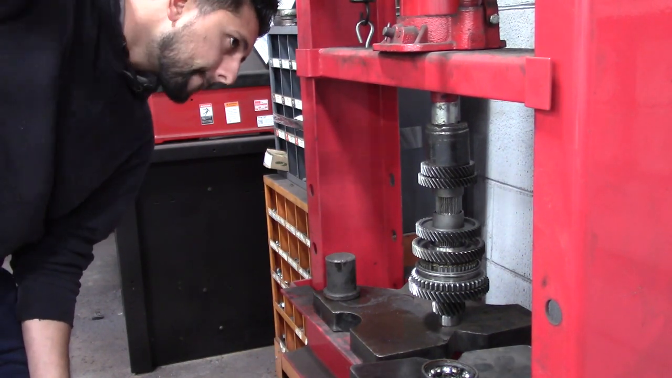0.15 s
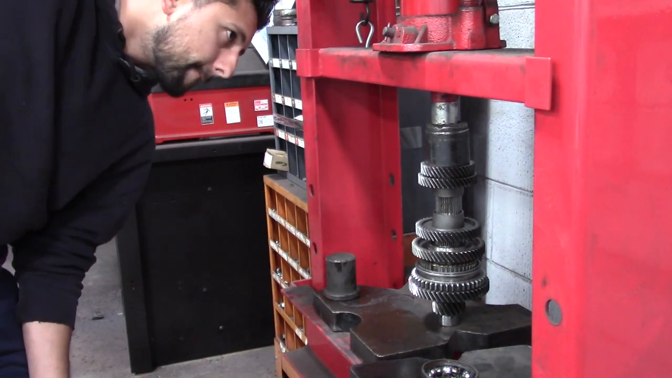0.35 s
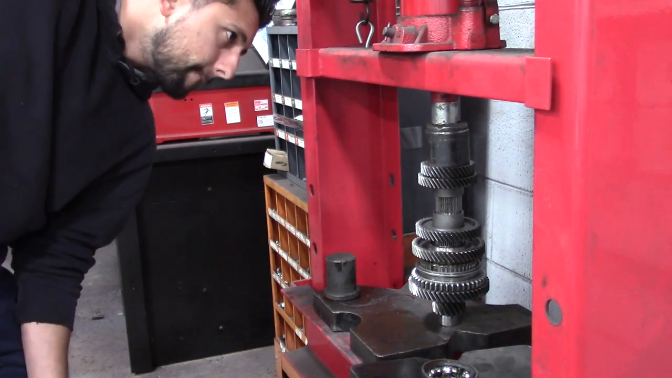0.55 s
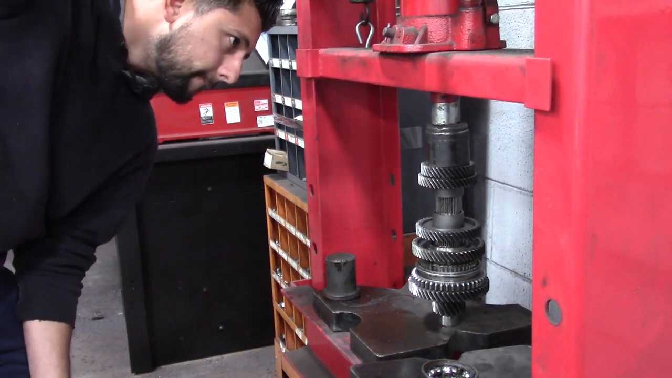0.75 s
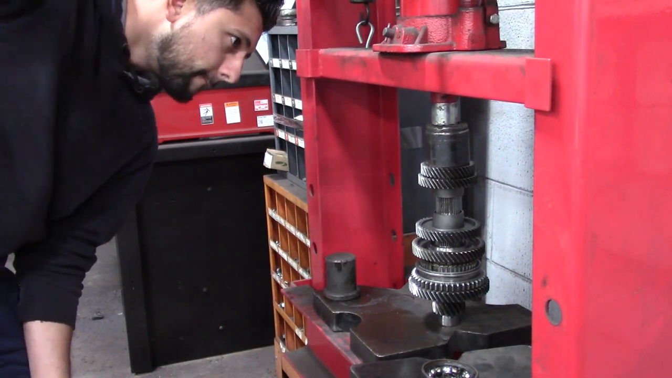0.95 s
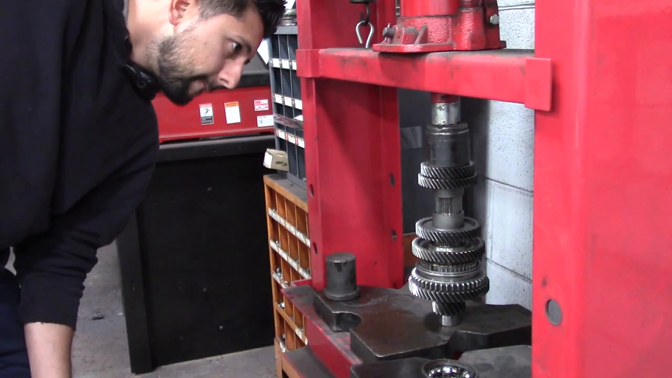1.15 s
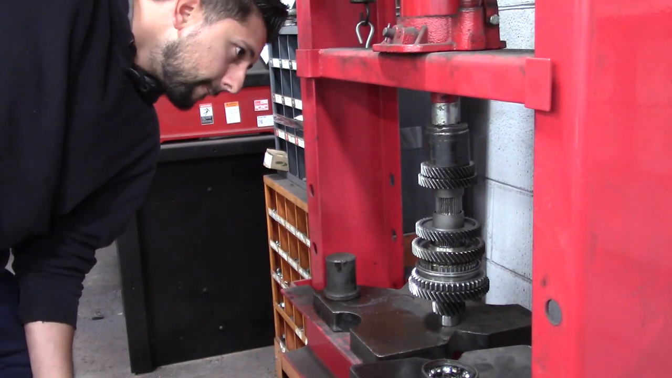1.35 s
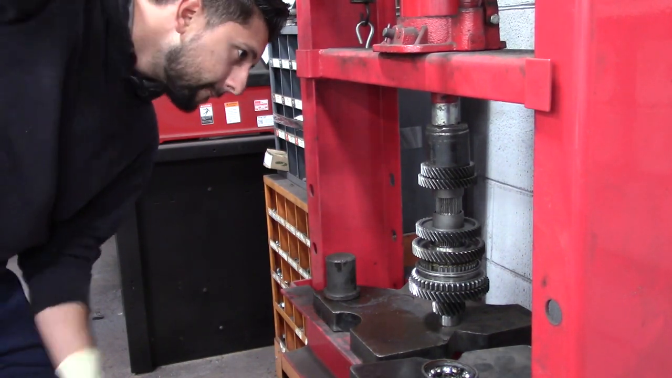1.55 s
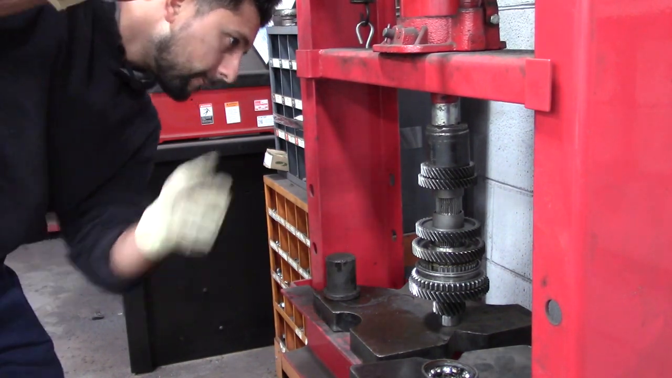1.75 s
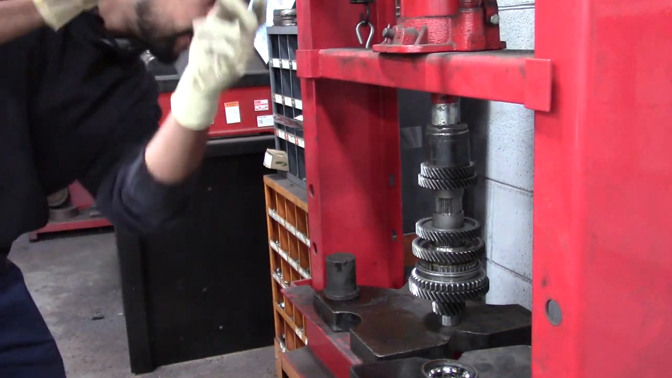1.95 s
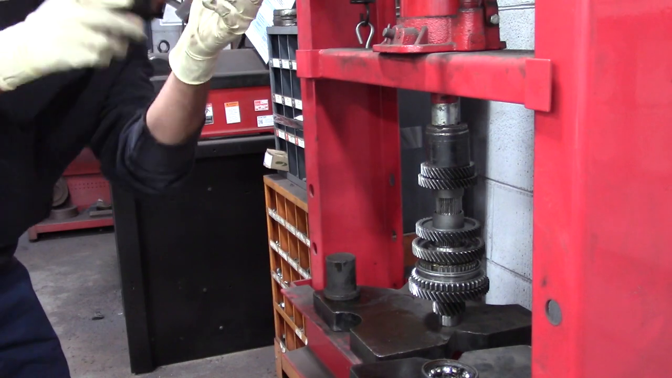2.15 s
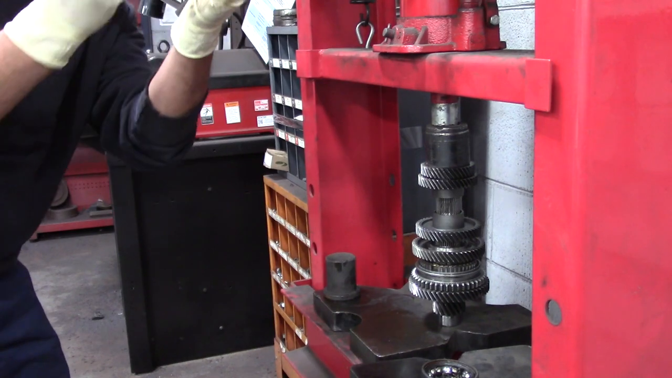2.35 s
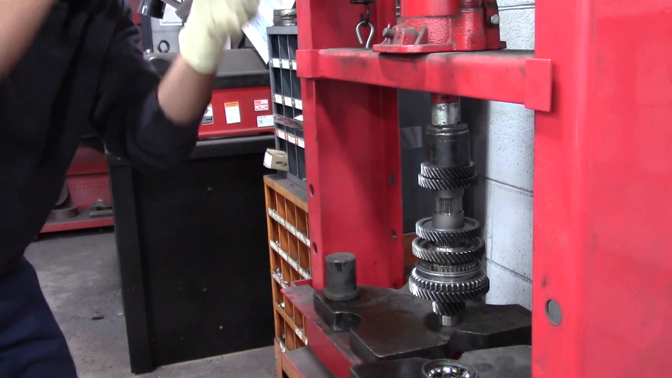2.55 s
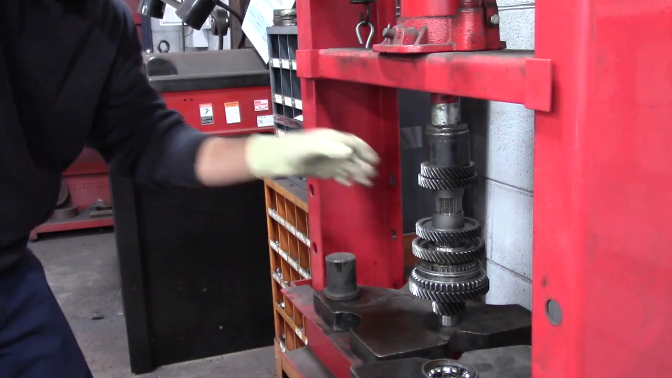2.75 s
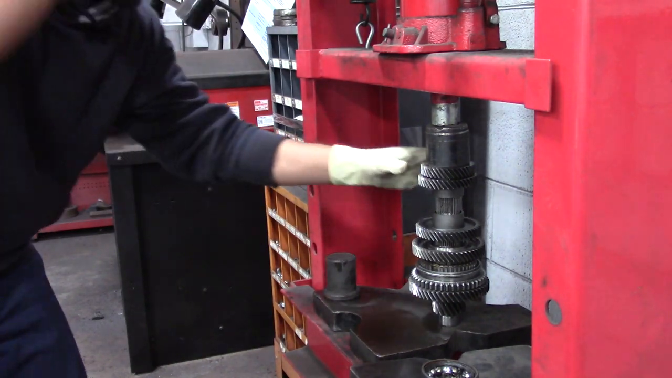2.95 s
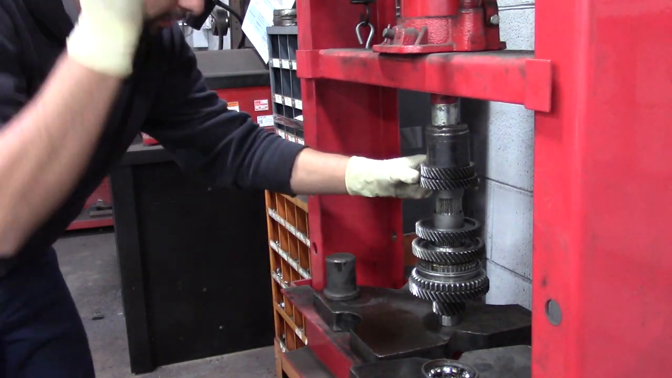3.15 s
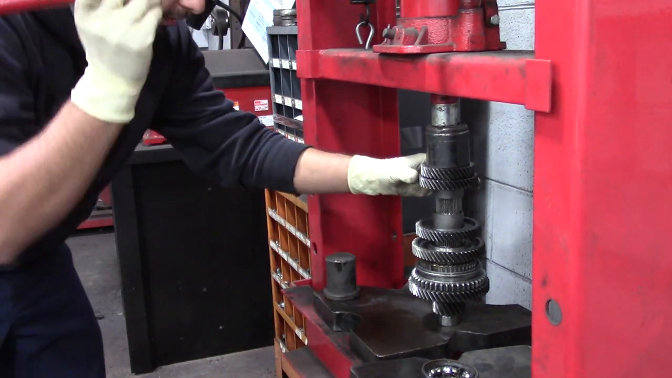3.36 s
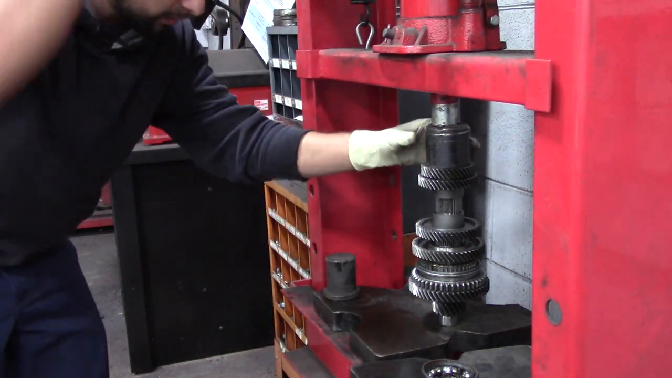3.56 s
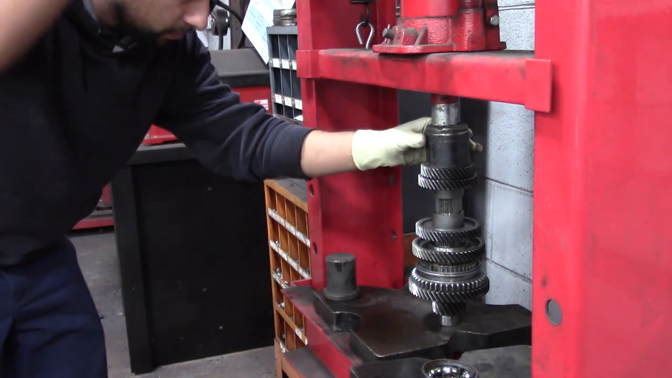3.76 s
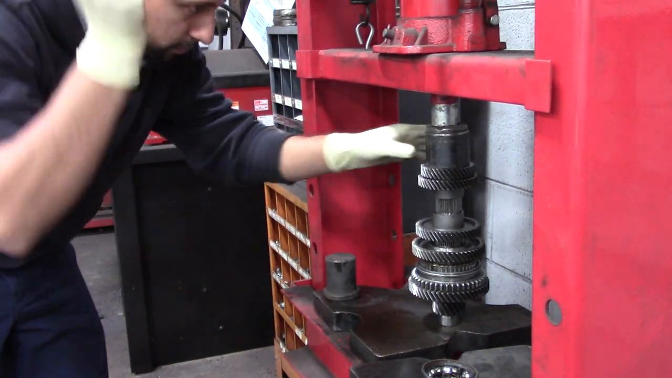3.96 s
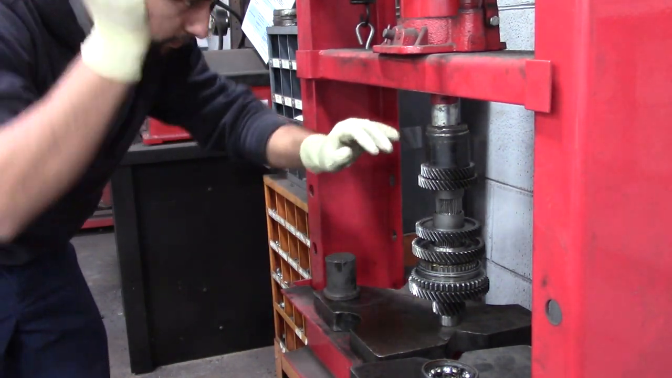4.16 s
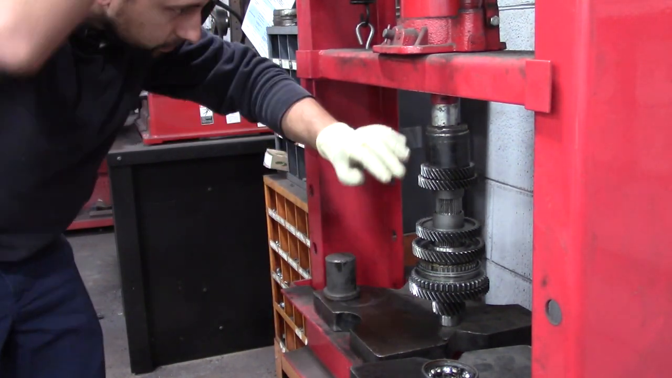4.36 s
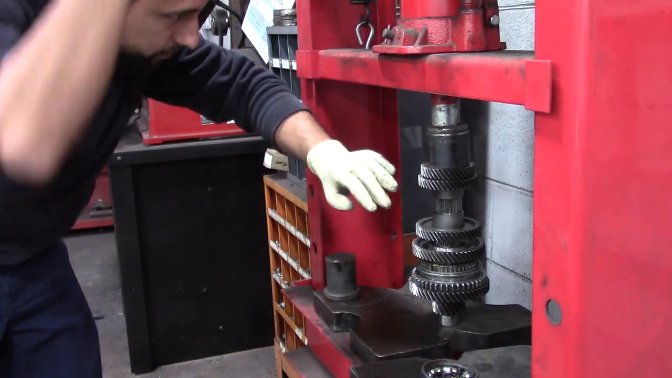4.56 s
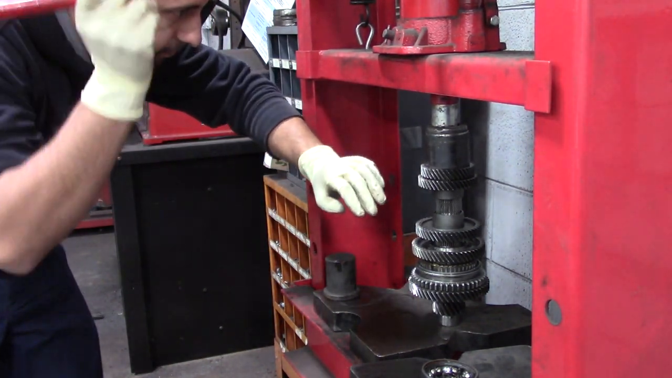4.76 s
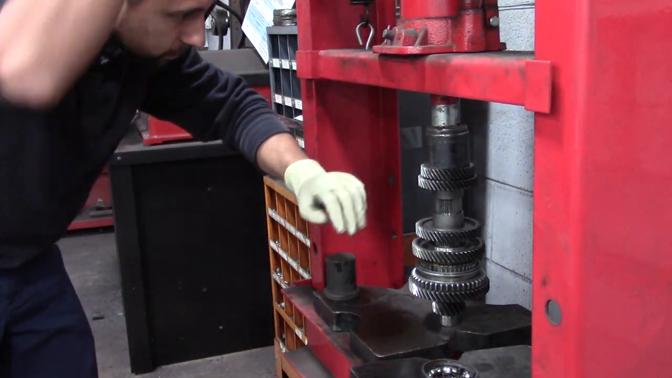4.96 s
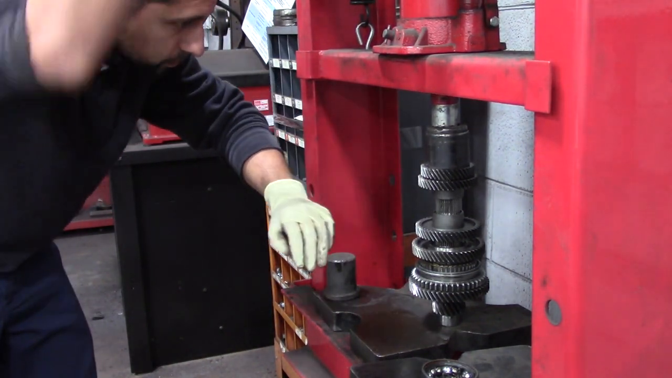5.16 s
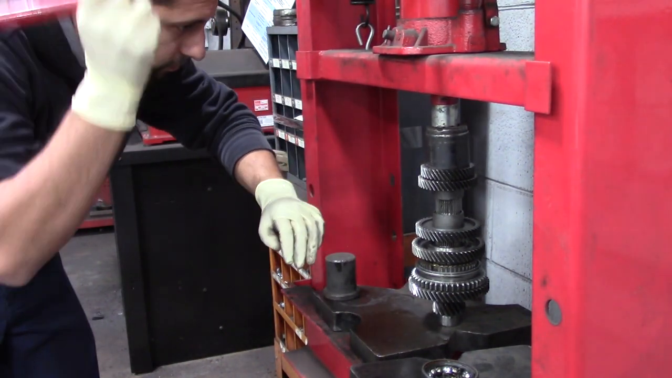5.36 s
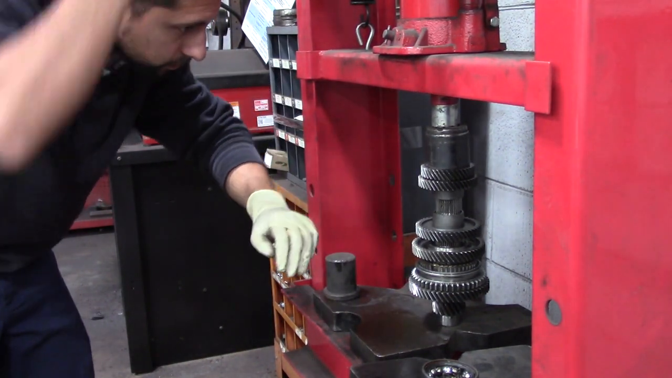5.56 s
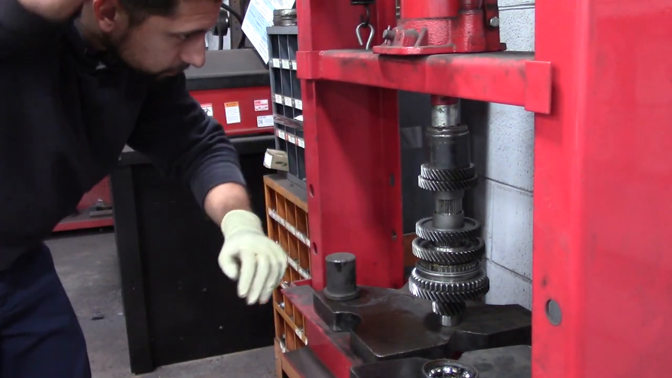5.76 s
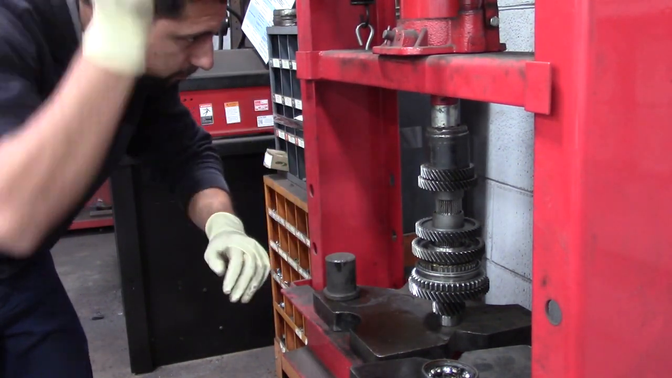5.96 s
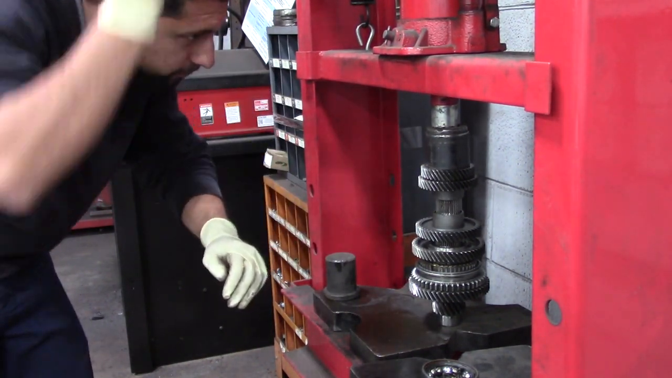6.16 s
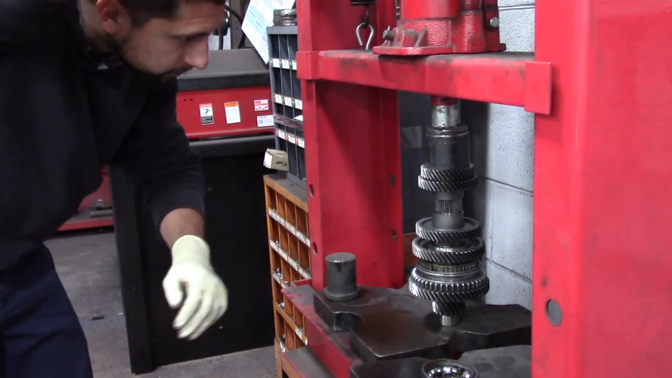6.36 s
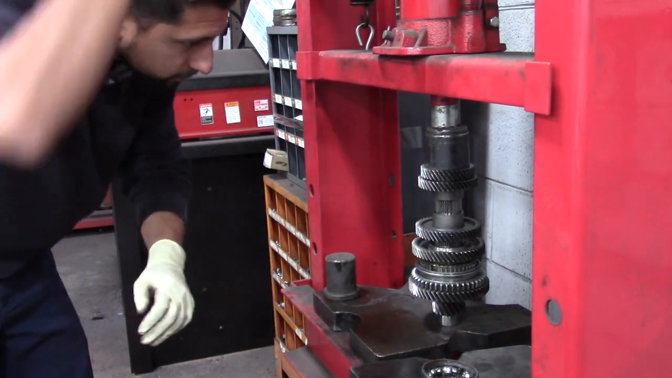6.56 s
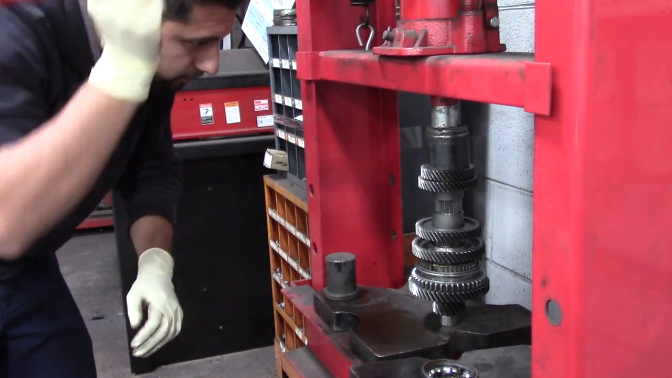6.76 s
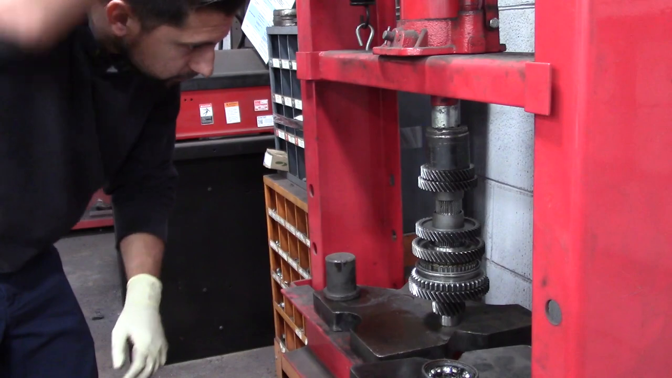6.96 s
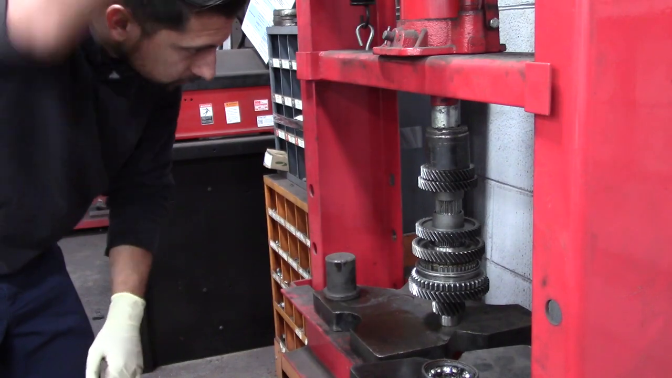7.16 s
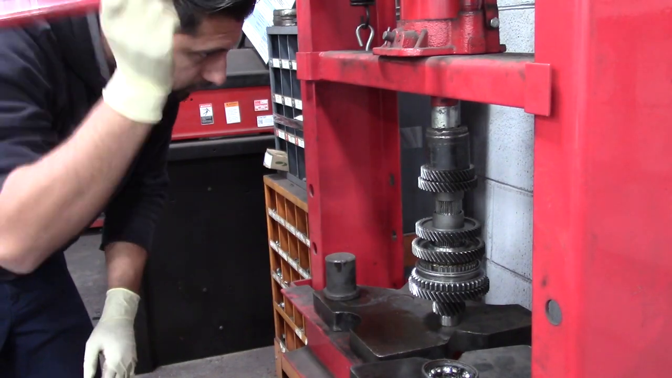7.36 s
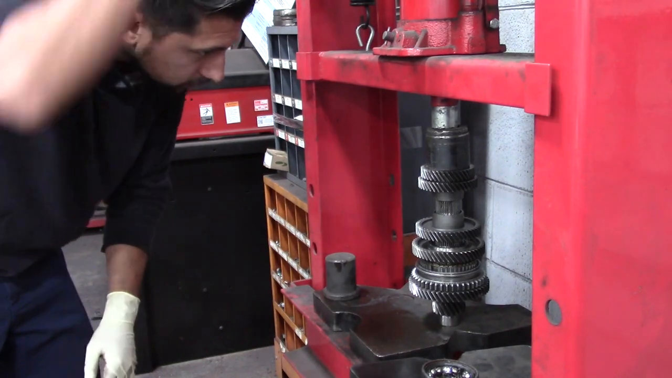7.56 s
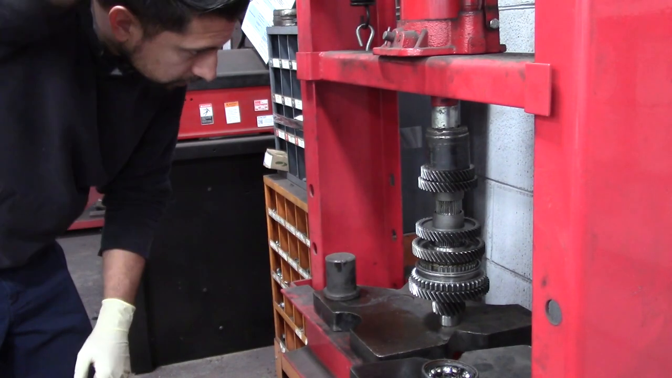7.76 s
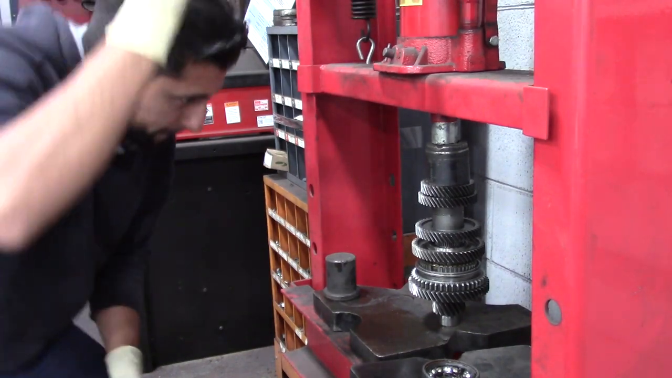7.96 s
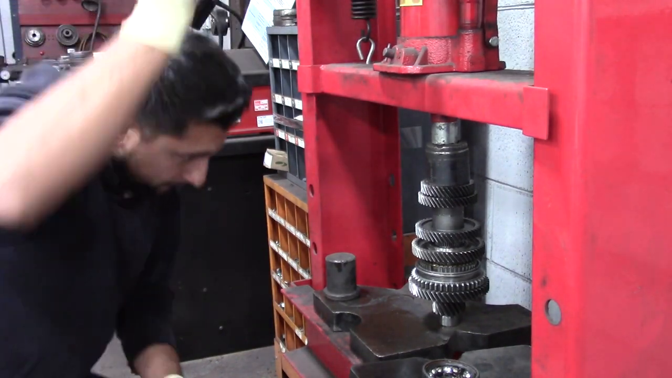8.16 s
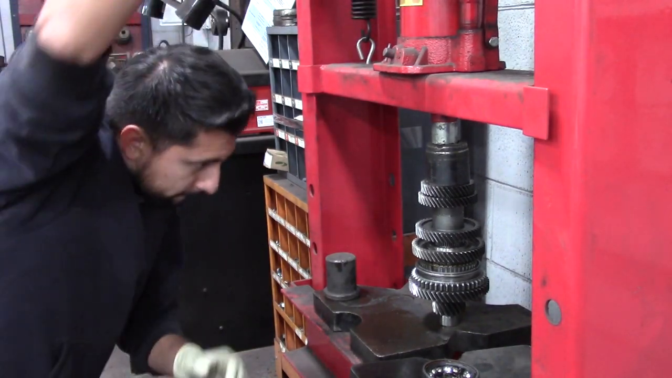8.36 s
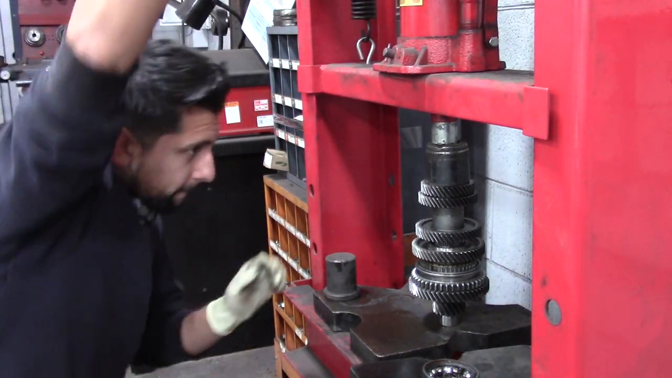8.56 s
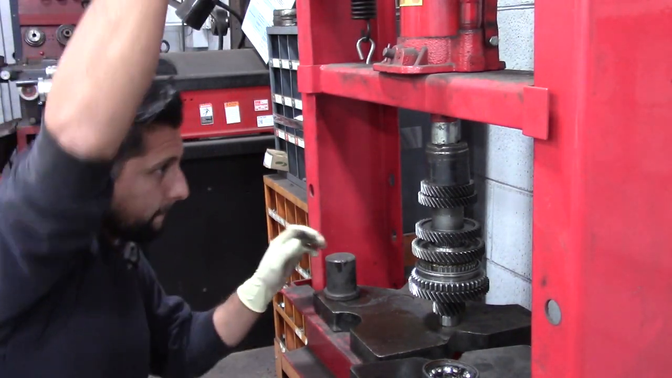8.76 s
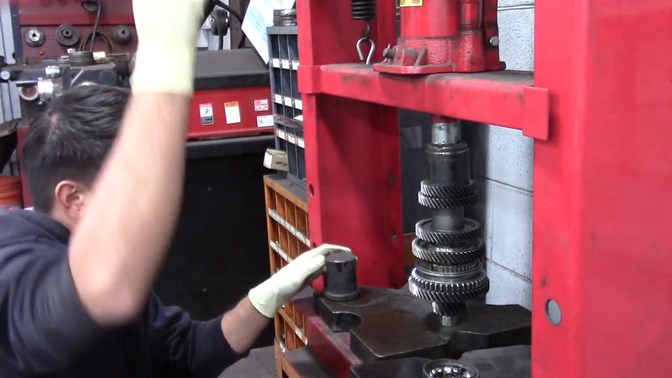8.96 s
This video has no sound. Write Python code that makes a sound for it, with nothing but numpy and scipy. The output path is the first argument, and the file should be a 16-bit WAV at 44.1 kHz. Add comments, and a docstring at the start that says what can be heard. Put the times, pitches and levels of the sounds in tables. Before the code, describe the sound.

Repeated metal clacks, short scrapes and ringing booms come from a hydraulic shop press being pumped by hand in a garage.

```python
"""A hydraulic shop press pumped by hand in a garage, heard from a close stereo microphone with a limiter.
The steel knocks, then the first push: the loose handle crosses its play (tick, clink, clack), the load
comes on and the whole frame booms. On the way back the pin scrapes and the handle rattles in its socket.
After a second push and a pause, the strokes settle to one about every two thirds of a second.
Two soft scuffs come around the last push, near 8.6 s. Workshop air and a faint hum lie under it all."""
import sys
import numpy as np
from scipy import signal
from scipy.fft import rfft, irfft
from scipy.io import wavfile
from scipy.ndimage import uniform_filter1d

SR = 44100
rng = np.random.default_rng(int(sys.argv[2]) if len(sys.argv) > 2 else 0)


def wrap_up_sound(samples):
    """Save the sound to the file named by the first command line argument, as 16-bit audio."""
    columns = np.atleast_2d(samples).T
    # keep every value between -1 and 1, then stretch to whole-number steps
    tamed = np.clip(columns, -1, 1)
    steps = np.round(tamed * 32767).astype(np.int16)
    wavfile.write(sys.argv[1], SR, steps)


N = 397782

JOLT_LAG_S, GEAR_LAG_S, JOLT_CUT_HZ = 0.006, 0.021, 394
# Down strokes: clack_s, play_s, swing_db, load_wait_s, boom_db, slip_s, bass_lift_db, gear_db
PUSH_STROKES = [(.592, 0.061, -9, 0.037, -9, 0.035, 1.5, -29),
                (1.393, 0.055, -8.5, .037, -8, 0.026, 0.5, -23),
                (2.969, 0.061, -14.5, 0.052, -6.5, 0.12, 3.5, -11),
                (3.833, 0.052, -8, 0.035, -6.5, 0.091, -1.5, -15.5),
                (4.547, 0.048, -7.5, 0.031, -7.5, 0.085, 0, -15.5),
                (5.200, 0.047, -7.5, 0.03, -7, 0.11, 0.5, -11),
                (5.850, 0.047, -7, 0.03, -7.5, 0.11, 0, -10), (6.518, 0.05, -6, .031, -9, 0.135, -3.5, -17),
                (7.184, 0.044, -6, 0.031, -9, 0.073, -3.5, -17.5),
                (7.842, 0.051, -6.5, 0.034, -7, 0.0093, -3.5, -41),
                (8.622, 0.067, -12.5, 0.165, -9.5, 0.076, 2, -24)]

def pushes():
    """Socket, pin and link meet in turn, then the load comes on. Gives linkage and frame sound apart."""
    linkage, booms, jolts = np.zeros((3, N))
    for clack_s, play_s, swing_db, wait_s, boom_db, slip_s, bass_db, gear_db in PUSH_STROKES:
        add(linkage, clack_s - play_s, bounced(tick, swing_db - 9.5))
        add(linkage, clack_s - 0.48 * play_s, clink(swing_db - 0.5))
        add(linkage, clack_s, clack(swing_db))
        add(jolts, clack_s + JOLT_LAG_S, jolt(swing_db - 9.5))
        load_s = clack_s + wait_s
        add(booms, load_s, stressed(boom(boom_db, slip_s), THUMP_HZ, boost_db=bass_db, octaves=0.79))
        add(linkage, load_s + GEAR_LAG_S, gear_ring(gear_db))
    return linkage, high_pass(booms, hz=119) + high_pass(jolts, hz=JOLT_CUT_HZ)

FRAME_T60_S, FRAME_MODES_DB = 0.94, 3
THUMP_HZ, THUMP_DB, THUMP_PEAK_S = 260, -8, 0.007
# Main modes of the press frame: pitch_hz, level_db
FRAME_MODES = [(153, -9.5), (218, 1.5), (236, 2.5), (281, -2), (441, 4), (458, 5), (504, 5), (520, 6),
               (581, 7), (601, 10), (631, 9), (654, 12.5), (678, 10), (711, 12), (838, 6), (868, 5),
               (955, 6.5), (1026, -3.5), (1078, 1.5), (1126, -3.5), (1238, 0.5), (1328, 0.5), (1403, -4),
               (1489, -21), (1522, -5.5), (1835, -6), (1915, -9)]
# One barely damped mode that sings on between strokes: pitch_hz, level_db, t60_s
FRAME_SINGING_MODE = [(755, 0, 3.1)]
# The frame's lesser modes: pitch_hz, density_db, t60_s
FRAME_LESSER = [(30, -75, 0.23), (85, -38, .5), (125, -8.5, 0.6), (335, 1, 0.86), (614, -2, 1),
                (950, -3.5, 1), (1410, -11, 0.59), (2190, -13.5, 0.54), (2540, -22.5, 0.71),
                (5030, -37.5, 0.78), (7000, -56, 0.19), (16000, -104, .15)]

def boom(db, slip_s):
    """The gear breaks loose with a low thump and feeds the frame for as long as it slips."""
    tilt = np.clip(-1.4 + 12.7 * slip_s, -1, 1.5)  # a longer slip is brighter
    modes = damped(FRAME_MODES, FRAME_T60_S) + FRAME_SINGING_MODE
    ring = strike(modes, FRAME_LESSER, modes_db=FRAME_MODES_DB, rise_s=0.0028, rasp_db=-0.5,
                  size=65536, tilt=tilt, centre_hz=660, slip_s=slip_s)
    t = np.arange(len(ring)) / SR
    punch = 1 + 0.3 * np.exp(-t / 0.04)  # the break from rest pushes hardest
    swell = (t / THUMP_PEAK_S * np.exp(1 - t / THUMP_PEAK_S)) ** 2
    thump = swell * np.sin(2 * np.pi * (THUMP_HZ * t + rng.random()))
    return amp(db) * (ring * punch + amp(THUMP_DB) * thump)

def jolt(db):
    """A clack shakes the frame lightly, with little bass."""
    return amp(db) * strike(damped(FRAME_MODES, FRAME_T60_S), FRAME_LESSER, modes_db=FRAME_MODES_DB,
                            rise_s=0.00087, rasp_db=4, size=32768, tilt=5.3, centre_hz=590)

# Modes of the handle socket: pitch_hz, level_db, t60_s
SOCKET_MODES = [(3120, 0, 0.24), (3176, 10.5, 0.023), (3963, 15, 0.018), (4260, 9.5, 0.046),
                (5630, 9.5, 0.06), (6500, 6.5, 0.05), (8560, -6.5, 0.14)]
# Its lesser modes: pitch_hz, density_db, t60_s
SOCKET_LESSER = [(300, 3.5, 0.15), (1770, -8, 0.49), (3200, 9.5, 0.019), (6350, -8.5, 0.16),
                 (7400, 0, 0.013), (14700, -16, 0.13)]

def tick(db):
    """The handle touches its socket."""
    return amp(db) * strike(SOCKET_MODES, SOCKET_LESSER, modes_db=1.5, rise_s=0.00021, rasp_db=4,
                            size=4096)

# Modes of the link pin: pitch_hz, level_db, t60_s
PIN_MODES = [(5980, 3.5, 0.038), (8670, -3.5, 0.077), (10840, 4, 0.024), (11070, -5, 0.11),
             (14050, 7, 0.031)]
# Its lesser modes: pitch_hz, density_db, t60_s
PIN_LESSER = [(505, 9.5, 0.0058), (1860, -9, 0.96), (3440, 1, 0.2), (8200, 2.5, 0.11), (10500, -4, 0.17),
              (13000, 2, 0.072), (17100, -23, 0.05)]

def clink(db):
    """The link pin slides home; firmer is brighter."""
    return amp(db) * strike(PIN_MODES, PIN_LESSER, modes_db=7, rise_s=0.00055, rasp_db=4,
                            size=8192, tilt=7 + 0.5356 * db, centre_hz=7240)

# Lesser modes of the link: pitch_hz, density_db, t60_s
LINK_LESSER = [(200, -16, 0.052), (2390, 13.5, 0.22), (4540, 11, 0.084), (4800, -5.5, 0.26),
               (5530, 14, 0.084), (7800, 2.5, 0.097), (11270, 13.5, 0.024), (13400, 2, 0.027),
               (16100, -5.5, 0.02)]

def clack(db):
    """The linkage meets the end of its play; harder is brighter."""
    return amp(db) * strike(PIN_MODES, LINK_LESSER, modes_db=-7.5, rise_s=0.0004, rasp_db=0.5,
                            size=8192, tilt=10.5 + 0.7 * db, centre_hz=5650)

# Modes of the gear: pitch_hz, level_db, t60_s
GEAR_MODES = [(3370, -1, 0.25), (4380, -3, 0.14), (4730, -5, 0.21), (6770, 4.5, 0.038)]
# Its lesser modes: pitch_hz, density_db, t60_s
GEAR_LESSER = [(1500, 8, 0.18), (3020, 13, 0.16), (5300, -0.5, 0.22), (6900, -26, 0.048), (14000, -32, .05)]

def gear_ring(db):
    """The gear rings as it breaks loose on the shaft."""
    return amp(db) * strike(GEAR_MODES, GEAR_LESSER, modes_db=-1, rise_s=0.002, rasp_db=7, size=16384)

# Back strokes: clack_s, clack_db, scrape_s, scrape_db
BACK_STROKES = [(0.175, -13.5, 0.02, -14.5), (.989, -8, 0.021, -2.5), (2.320, -21, 0.016, -7),
                (3.435, -13.5, 0.015, -12), (4.175, -12, 0.0082, -17), (4.841, -9.5, 0.015, -8.5),
                (5.502, -9, 0.016, -3.5), (6.153, -8, 0.037, -2.5), (6.820, -8.5, 0.038, -5.5),
                (7.485, -7, 0.031, -5), (8.188, -4.5, 0.021, -4)]

def pulls():
    """Pulled back, the pin scrapes up to a clack. Gives linkage and jolted frame sound apart."""
    linkage, jolts = np.zeros((2, N))
    for clack_s, clack_db, scrape_s, scrape_db in BACK_STROKES:
        add(linkage, clack_s - scrape_s, scrape(scrape_db, scrape_s))
        add(linkage, clack_s, clack(clack_db))
        add(jolts, clack_s + JOLT_LAG_S, jolt(clack_db - 15.5))
    return linkage, high_pass(jolts, hz=JOLT_CUT_HZ)

SLIPS_PER_S, SCRAPE_RELEASE_S = 900, 0.00093
SQUEAK_HZ, SQUEAK_DB = 5650, -12

def scrape(db, length_s):
    """The pin drags across its hole: tiny slips ring pin and socket; a squeak rises as it binds."""
    t = np.arange(8192) / SR
    progress = np.minimum(t / length_s, 1)
    pressure = progress ** 0.33 * np.exp(-np.maximum(t - length_s, 0) / SCRAPE_RELEASE_S)
    slips = pressure * rng.standard_normal(len(t)) * (rng.random(len(t)) < SLIPS_PER_S / SR)
    ring = sum(signal.fftconvolve(slips, part)[:len(t)] for part in (clink(db), tick(db - 5.5)))
    grind = unit(ring) * np.sqrt(np.mean(pressure ** 2)) / 2
    bend = 0.076 * rng.uniform(.5, 1) * progress
    hz = SQUEAK_HZ * (1 + bend + .025 * wobble(len(t), hz=900))
    squeak = pressure * np.sin(2 * np.pi * np.cumsum(hz) / SR)
    return amp(db) * (grind + amp(SQUEAK_DB) * squeak)

# Touches in the socket: start_s, level_db, stressed_pitch_hz
SOCKET_TICKS = [(0.111, -11, 11200), (0.462, -11, 5960), (.967, -4.5, 3380), (1.061, -17.5, 3560),
                (1.927, -35.5, 3220), (2.228, -11.5, 6400), (2.387, -25, 8500), (2.472, -15, 3620),
                (2.705, -25, 3700), (2.931, -15.5, 4160), (3.390, -19, 13900), (3.469, -10, 3850),
                (4.129, -25.5, 6000), (4.206, -13, 3600), (4.801, -12, 4740), (4.870, -11.5, 3670),
                (5.462, -6.5, 6350), (5.528, -11, 3740), (6.125, -7, 5660), (6.183, -9.5, 4030),
                (7.439, -12, 5600), (8.189, -0.5, 4070), (8.217, -8, 4020)]
# Rings of the free-swinging tube: start_s, level_db, stressed_pitch_hz
TUBE_PINGS = [(2.268, -19.5, 4370), (4.784, -20.5, 4370), (6.112, -18, 4450), (6.779, -14.5, 3920),
              (7.423, -14.5, 5700)]

def handle_rattle():
    """The slack handle knocks about in its socket and rings as it swings free."""
    out = np.zeros(N)
    for start_s, db, hz in SOCKET_TICKS:
        add(out, start_s, stressed(tick(db), hz, boost_db=6, octaves=0.55))
    for start_s, db, hz in TUBE_PINGS:
        add(out, start_s, stressed(ping(db), hz, boost_db=4.5, octaves=0.32))
    return out

# Modes of the handle tube: pitch_hz, level_db, t60_s
TUBE_MODES = [(2220, -2, 0.2), (3280, 3, 0.09), (4360, 1.5, 0.12), (5600, 2.5, 0.11), (7130, -8, .1),
              (8200, -10, .06)]

def ping(db):
    """The handle tube rings and wavers as it slides in its socket."""
    return amp(db) * strike(TUBE_MODES, SOCKET_LESSER, modes_db=5, rise_s=0.0006, rasp_db=3.5,
                            size=16384, slip_s=.03)

# Modes of the cross beam: pitch_hz, level_db
BEAM_MODES = [(459, -5), (481, -7), (653, 1), (1019, -3), (1111, -5), (1167, -3), (1236, 3), (1404, -7),
              (1490, 2), (1512, -5), (1555, 5), (2315, 1), (2379, 2), (2574, 0), (2750, -3), (3348, -4.5),
              (3520, -7), (3774, -8), (3892, -4)]
# Its lesser modes: pitch_hz, density_db, t60_s
BEAM_LESSER = [(150, -62, 0.76), (436, 1, 0.82), (754, -2.5, 1), (1430, 6, 0.71), (2080, -1, 0.37),
               (2520, 2, 0.75), (3080, -10, 0.76), (3770, -4.5, 0.57), (6260, -7, 0.04),
               (15000, -31, 0.041)]
# The loaded steel gives: start_s, level_db, tilt_db_per_octave, slip_s
BEAM_KNOCKS = [(-.16, -5, -2.5, 0.019), (.456, -7, -1.5, 0.04), (2.992, -17.5, -7, .005),
               (3.848, -21, -8.5, 0.004), (8.644, -28.5, -4.5, 0.039)]

def beam_knocks():
    """Sudden slips in the loaded stack ring the cross beam."""
    out = np.zeros(N)
    for start_s, db, tilt, slip_s in BEAM_KNOCKS:
        ring = strike(damped(BEAM_MODES, t60_s=0.48), BEAM_LESSER, modes_db=4, rise_s=0.00031,
                      rasp_db=-5, size=32768, tilt=tilt, centre_hz=1650, slip_s=slip_s)
        add(out, start_s, amp(db) * ring)
    return out

# Modes of the pump body: pitch_hz, level_db, t60_s
PUMP_MODES = [(1970, -1.5, 0.26), (3010, 2, 0.14), (3260, -2, 0.24)]
# Its lesser modes: pitch_hz, density_db, t60_s
PUMP_LESSER = [(400, -8, 0.72), (1300, 4, 0.56), (3300, -1.5, 0.33), (5000, -5, 0.13), (7000, -10.5, 0.072),
               (15000, -19, 0.032)]
# Taps at the bottom of the stroke: start_s, level_db
PUMP_TAPS = [(0.831, -19.5), (3.263, -24.5), (4.035, -21), (5.374, -17.5), (6.025, -18.5), (6.709, -18.5),
             (7.375, -15.5), (9.016, -20.5)]

def pump_taps():
    """The pump body rings when its piston bottoms."""
    out = np.zeros(N)
    for start_s, db in PUMP_TAPS:
        ring = strike(PUMP_MODES, PUMP_LESSER, modes_db=-4.5, rise_s=0.00045, rasp_db=-4, size=16384)
        add(out, start_s, amp(db) * ring)
    return out

# Soft scuffs: start_s, length_s, level_db
SOFT_SCUFFS = [(8.007, 0.18, -32), (8.451, 0.057, -27)]

def scuffs():
    """Short rubbing noises with a rough grain."""
    out = np.zeros(N)
    for start_s, length_s, db in SOFT_SCUFFS:
        size = int(length_s * SR)
        rub = noise([(200, -3), (900, 12.5), (4000, 3.5), (9000, -4), (15000, -21)], size=16384)[:size]
        add(out, start_s, amp(db + 2 * wobble(size, hz=200)) * rub * signal.windows.tukey(size, .5))
    return out

# Ring time of the garage: pitch_hz, t60_s
GARAGE_DECAY = [(150, 0.01), (700, 0.16), (2500, 0.91), (6000, 0.45), (14000, 0.17)]

def garage(x):
    """Sparse echoes of random sign; the two close microphones hear nearly the same ones."""
    t = np.arange(SR) / SR
    echoes = rng.choice([-1., 1.], (2, SR)) * (rng.random((2, SR)) < .12)
    tail = dying(echoes, lambda hz: read(GARAGE_DECAY, hz)) * (1 - np.exp(-t / 0.0035))
    mid, side = signal.fftconvolve(x[None], tail / np.linalg.norm(tail[0]), axes=1)[:, :N]
    return mid + amp(-12) * np.array([side, -side])

AIR_DB = -33.5
# Room tone at the microphone: pitch_hz, density_db
AIR_SPECTRUM = [(20, -23), (60, -4.5), (150, 8), (720, 6.5), (1200, 1.5), (2500, -9), (5500, -16.5),
                (9400, -12), (13000, -21), (16000, -30)]
# Hum in the room: pitch_hz, level_db
HUM_TONES = [(160, -48.5), (277, -45.5)]

def room_tone():
    """The steady rush of the workshop, with a faint wavering hum and a little hiss on top."""
    t = np.arange(N) / SR
    mid = amp(AIR_DB + 0.25 * wobble(N, hz=12)) * noise(AIR_SPECTRUM, N)
    for hz, db in HUM_TONES:
        level = amp(db + 0.24 * wobble(N, hz=1.97)) * np.sqrt(2)
        mid += level * np.sin(2 * np.pi * hz * t + wobble(N, hz=11))
    side = amp(AIR_DB - 31) * noise(AIR_SPECTRUM, N)
    return np.array([mid + side, mid - side])

def strike(modes, lesser, modes_db, rise_s, rasp_db, size, tilt=0., centre_hz=1000, slip_s=0.):
    """A blow on steel: main modes stand modes_db over chattering lesser ones; tilt is dB per octave."""
    t = np.arange(size) / SR
    hz, db, t60 = np.transpose(modes)[:, :, None]
    # load and contact vary from blow to blow, shifting each mode a little in pitch and strength
    hz = hz + np.clip(.005 * hz, 2, 22) * rng.standard_normal(hz.shape)
    weight = amp(db + 2.5 * rng.standard_normal(db.shape))
    phase = rng.random(hz.shape)
    if slip_s > 0:  # a slip jogs each mode, so it wavers and swells until the steel settles
        jogged = np.minimum(np.arange(size), int(2 * slip_s * SR))
        waver = np.array([wobble(jogged[-1] + 1, hz=16)[jogged] for _ in hz])
        swell = np.array([wobble(jogged[-1] + 1, hz=16)[jogged] for _ in hz])
        phase = phase + waver / (2 * np.pi)
        weight = weight * amp(3 * swell)
    decay = amp(-60 * age(t, slip_s) / t60)
    tones = (weight * decay * np.sin(2 * np.pi * (hz * t + phase))).sum(0)
    tones /= np.sqrt(np.mean(weight ** 2, axis=1).sum() / 2)
    chatter = unit(amp(min(rasp_db, 3.5) * wobble(size, hz=170)))
    dense = dying(noise(lesser, size), lambda f: read(lesser, f, column=2), slip_s) * chatter
    octaves = np.log2(np.clip(np.fft.rfftfreq(size, 1 / SR) / centre_hz, 1 / 4, 4))
    ring = irfft(rfft(amp(modes_db) * tones + dense) * amp(tilt * octaves), size)
    attack = 1 - np.exp(-t / rise_s)
    fade = np.minimum(10 * (1 - t / t[-1]), 1) ** 2
    return ring * attack * fade / np.hypot(1, amp(modes_db))

def bounced(touch, db):
    """A loose part touches, then bounces a few milliseconds later, slightly weaker."""
    out = np.zeros(10000)
    add(out, 0, touch(db))
    add(out, 0.007 * rng.uniform(0.54, 1.4), touch(db - 0.5))
    return out

def stressed(x, hz, boost_db, octaves):
    """Where a part is touched decides which of its pitches speaks most; the overall level stays."""
    size = 2 * len(x)
    away = np.log2((np.fft.rfftfreq(size, 1 / SR) + 1) / hz) / octaves
    boost = amp(boost_db * np.exp(-away ** 2))
    return np.std(x) * unit(irfft(rfft(x, size) * boost)[:len(x)])

def damped(modes, t60_s):
    """Gives the modes of a large part their ring time: t60_s at 1 kHz, shorter higher up."""
    return [(hz, db, t60_s * (hz / 1000) ** -.3) for hz, db in modes]

def age(t, slip_s):
    """While a slip lasts it keeps feeding the ring, which therefore dies more slowly."""
    return t - .78 * np.minimum(t, slip_s)

def dying(x, t60_of, slip_s=0.):
    """Lets each frequency of x die at its own speed."""
    hz, t, spectra = signal.stft(x, SR, nperseg=256)
    decay = amp(-60 * age(t, slip_s) / t60_of(hz)[:, None])
    return signal.istft(spectra * decay, SR, nperseg=256)[1][..., :x.shape[-1]]

def noise(spectrum, size):
    """Steady noise of a given colour, rms 1."""
    colour = amp(read(spectrum, np.fft.rfftfreq(size, 1 / SR)))
    return unit(irfft(rfft(rng.standard_normal(size)) * colour, size))

def wobble(size, hz):
    """A random wobble of rms about 1, with hz new values a second."""
    knots = np.sqrt(3) * rng.uniform(-1, 1, 1024)
    return np.interp(np.arange(size) * hz / SR, np.arange(len(knots)), knots)

def read(table, hz, column=1):
    """One column of a table along log frequency."""
    table = np.asarray(table, float)
    return np.interp(np.log(hz + 1), np.log(table[:, 0] + 1), table[:, column])

def add(mix, start_s, sound):
    """Lays a sound into the mix."""
    start = round(start_s * SR)
    sound = sound[max(-start, 0):]
    part = mix[max(start, 0):][:len(sound)]
    part += sound[:len(part)]

def amp(db):
    """Decibels to gain."""
    return 10 ** (np.asarray(db) / 20)

def unit(x):
    """Scales to rms 1."""
    return x / np.sqrt(np.mean(x ** 2) + 1e-20)

def high_pass(x, hz, order=2):
    """Takes away the bass."""
    return signal.sosfilt(signal.butter(order, hz, "high", fs=SR, output="sos"), x)

def microphone_spread(x, lead_s):
    """Sound reaches the left microphone just before the right, which parts them in the treble."""
    side = irfft(rfft(x) * 1j * np.pi * np.fft.rfftfreq(N, 1 / SR) * lead_s, N)
    return np.array([side, -side])

def scene():
    """Close to the press: the handle sits slightly right of centre; frame and room fill the middle."""
    push_linkage, push_frame = pushes()
    pull_linkage, pull_frame = pulls()
    handle = amp(-2) * high_pass(push_linkage + pull_linkage + handle_rattle(), hz=254)
    body = push_frame + pull_frame + beam_knocks() + pump_taps() + scuffs()
    direct = handle * amp([[-.45], [.45]]) + body + room_tone()
    echoes = garage(amp(-17) * handle + amp(-16) * body)
    return direct + microphone_spread(direct.mean(0), lead_s=4e-6) + echoes

LOW_CUT_HZ, HIGH_CUT_HZ = 54, 15900
LIMIT_DB, RECOVERY_DB_PER_S = -5, 40

def record(dry):
    """The near camera's microphone: low cut, a fast limiter slow to recover, rounded peaks, high cut."""
    dry = high_pass(dry, LOW_CUT_HZ, order=1)
    power = abs(uniform_filter1d((dry ** 2).mean(0), size=180))
    over_db = np.maximum(10 * np.log10(power + 1e-12) - LIMIT_DB, 0)
    recovery_db = np.arange(N) * RECOVERY_DB_PER_S / SR
    reduction_db = np.maximum.accumulate(over_db + recovery_db) - recovery_db
    held = dry / amp(uniform_filter1d(reduction_db, size=64))
    rounded = held / (1 + (held / .93) ** 8) ** (1 / 8)
    low_pass = signal.firwin(255, HIGH_CUT_HZ, window=("kaiser", 9), fs=SR)
    return signal.oaconvolve(rounded, low_pass[None], "same")

dry = scene()
out = record(dry)
wrap_up_sound(out)
```